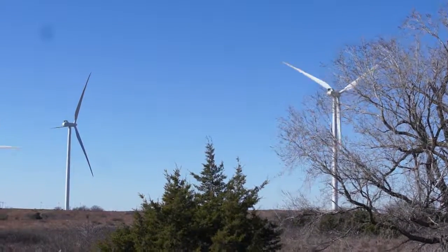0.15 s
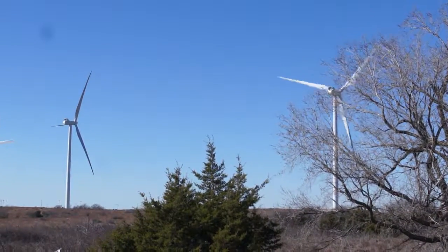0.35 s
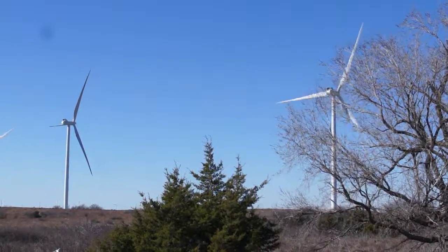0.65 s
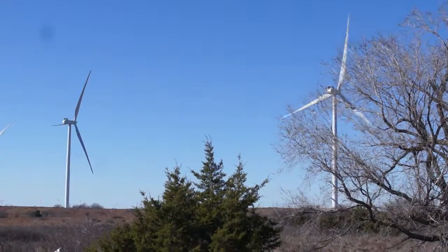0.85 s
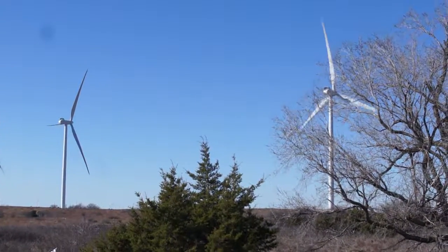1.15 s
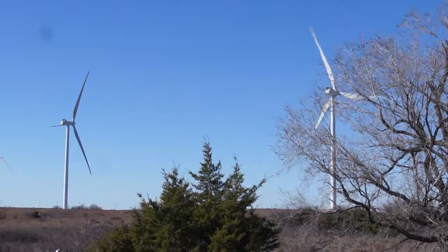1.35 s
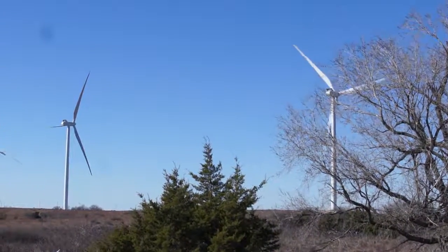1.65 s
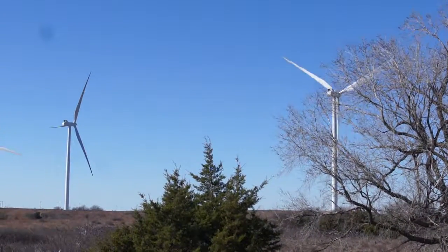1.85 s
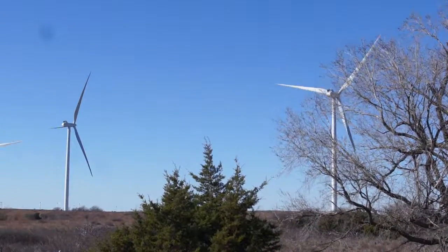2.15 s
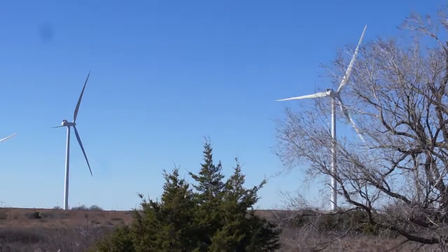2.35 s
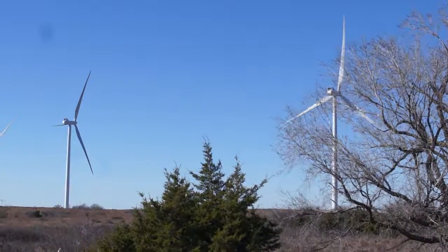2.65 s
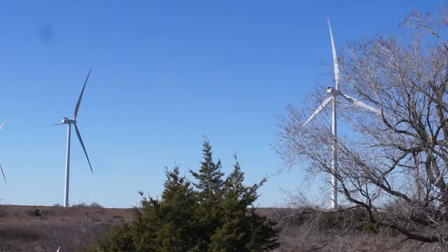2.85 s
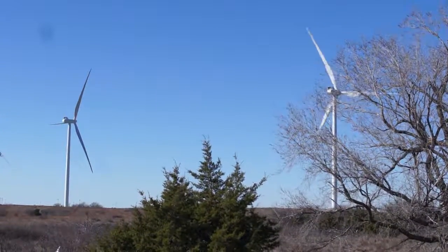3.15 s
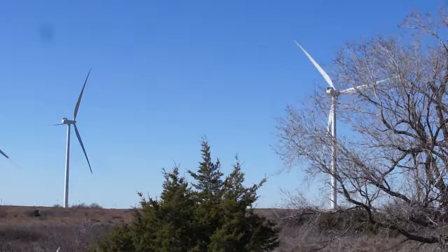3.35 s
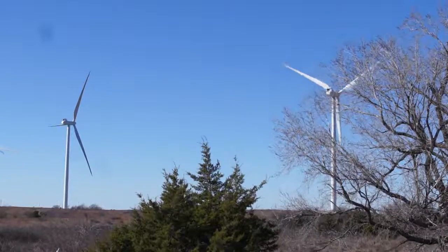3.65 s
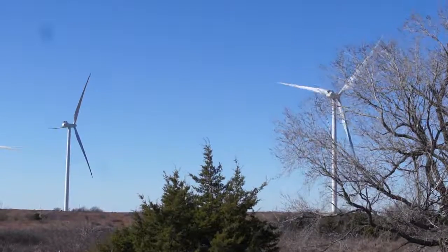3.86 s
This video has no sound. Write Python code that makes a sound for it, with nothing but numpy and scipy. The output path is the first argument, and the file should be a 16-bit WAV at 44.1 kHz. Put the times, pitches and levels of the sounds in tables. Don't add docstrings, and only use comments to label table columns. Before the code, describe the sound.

Wind turbine whooshing rhythmically, its breathy hollow swells mixed with low wind rumble and microphone puffs

```python
import sys
import numpy as np
from scipy import signal
from scipy.fft import rfft, irfft
from scipy.io import wavfile
from scipy.ndimage import uniform_filter1d

SR = 44100
rng = np.random.default_rng(int(sys.argv[2]) if len(sys.argv) > 2 else 0)


def how_loud(loudness_db):
    steps = np.asarray(loudness_db, float) / 20
    return 10 ** steps


def unload_wav(signal):
    wavfile.write(
        sys.argv[1],
        SR,
        np.round(np.clip(np.atleast_2d(signal).T, -1, 1) * 32767).astype(np.int16),
    )


N = 175959
T = np.arange(N) / SR
HZ = np.maximum(np.arange(N // 2 + 1) * SR / N, 1)
RIGHT_ONLY = np.array([[0], [1]])
PAN = np.array([[0.5], [-0.5]])


def over_time(table):
    return np.interp(T, *np.array(table, float).T)


def on_hz(table):
    hz, value = np.array(table, float).T
    return np.interp(np.log(HZ), np.log(hz), value)


def colour(table):
    octaves_below = np.maximum(np.log2(table[0][0] / HZ), 0)
    octaves_above = np.maximum(np.log2(HZ / table[-1][0]), 0)
    return how_loud(on_hz(table) - 23.0 * (octaves_below + octaves_above))


def ring(hz, width_hz):
    return np.abs(1 / (1 + 1j * (HZ ** 2 - hz ** 2) / (HZ * width_hz))) ** 2


def unit(x):
    return x / np.sqrt(np.mean(x ** 2))


def walk(rate):
    hold = int(SR / rate)
    steps = np.repeat(rng.standard_normal(N // hold + 1), hold)
    return 1.18 * uniform_filter1d(uniform_filter1d(steps, hold), hold)[:N]


def pair(loose, lead):
    both, left, right = rfft(rng.standard_normal((3, N)))
    loose = np.clip(loose, 0, 1)
    shared = np.sqrt(1 - loose) * both * np.exp(1j * lead * RIGHT_ONLY)
    return shared + np.sqrt(loose) * np.array([left, right])


# (frequency [Hz], level per Hz [dB])
RUMBLE_COLOUR = [(25, -25), (55, -18), (90, -2.5), (115, -7), (220, -2), (300, -7), (390, -15), (700, -28)]


def rumble():
    breath_db = 2.0 * np.array([walk(4.7), walk(5.91)])
    return unit(irfft(pair(0.077, 0.12) * colour(RUMBLE_COLOUR), N)) * how_loud(-41.5 + breath_db)


# (frequency [Hz], level per Hz [dB])
HISS_COLOUR = [(600, -6), (1500, -3.5), (2200, -7.5), (3000, -12), (4500, -15), (6300, -17.5),
               (8000, -20.5), (11000, -20.5)]


def hiss():
    return unit(irfft(pair(0.82, 2.63) * colour(HISS_COLOUR), N)) * how_loud(-46 + 0.4 * walk(2.6))


# (start frequency [Hz], end frequency [Hz], start level [dB], end level [dB], wobble [dB])
GEARBOX_TONES = [
    (80.1, 77.2, -48, -44.5, 1),
    (127.3, 122.8, -48, -41, 0.3),
]


def gearbox_hum():
    wander_hz, lead_rad = 0.27, 0.43
    out = 0
    for start_hz, end_hz, start_db, end_db, wobble_db in GEARBOX_TONES:
        hz = np.linspace(start_hz, end_hz, N) + wander_hz * walk(3.3)
        phase = 2 * np.pi * np.cumsum(hz) / SR
        db = np.linspace(start_db, end_db, N) + wobble_db * walk(3.96)
        out = out + np.sqrt(2) * how_loud(db) * np.sin(phase + lead_rad * RIGHT_ONLY)
    return out


# (multiple of the motor rate, left level [dB], right
# level [dB], both averaged [dB])
MOTOR_OVERTONES = [(14, -62, -66, -64), (15, -67, -64, -67), (19, -64, -63, -68), (20, -62, -59, -66),
                   (21, -73, -65, -74), (22, -63, -69, -68), (24, -57, -57, -62), (25, -65, -61, -66),
                   (27, -63, -70, -67), (30, -60, -62, -62), (32, -64, -60, -72), (40, -75, -55, -61),
                   (42, -57, -60, -69), (51, -65, -69, -79), (53, -61, -65, -74), (55, -59, -81, -65),
                   (56, -65, -77, -71), (60, -59, -77, -65), (61, -64, -70, -69), (63, -63, -74, -67),
                   (64, -68, -74, -80), (65, -82, -68, -76), (66, -66, -75, -71), (68, -63, -71, -72),
                   (69, -67, -65, -70), (74, -78, -63, -69), (76, -73, -61, -69), (78, -66, -71, -74),
                   (79, -66, -73, -74), (81, -67, -75, -70),
                   (16, -70, -72, -80), (17, -70, -70, -70), (29, -74, -67, -74), (33, -67, -66, -67),
                  (34, -74, -70, -80), (35, -69, -74, -72), (37, -73, -70, -72), (41, -67, -72, -70),
                  (43, -67, -67, -75), (45, -66, -67, -69), (46, -69, -69, -76), (47, -69, -67, -70),
                  (50, -69, -71, -78), (52, -69, -74, -78), (58, -69, -72, -74), (59, -67, -70, -70),
                  (71, -73, -72, -83), (73, -69, -76, -72), (77, -72, -73, -79), (82, -78, -68, -72),
                  (84, -77, -70, -73), (86, -80, -70, -78)]
# (time [s], share [0-1])
HAND_GRIP = [(0, 0), (.7, 0.1), (1.0, 0.75), (1.5, 0.9), (2.0, 0.4), (2.3, 0.35), (2.9, 0), (3.3, 0),
             (3.99, 0)]
# (multiple, left change [dB], right change [dB])
GRIP_EFFECT = [(24, .5, 1), (27, -3, -10), (33, 0, -3), (40, -14, 5), (41, -3, -3), (68, -2, 9),
               (76, -3, 0), (78, -2, -3)]


def motor():
    motor_hz, rest_db, trim_db, wobble_db = 123.464, -82, 0.6, 0.5
    spread = 0.236
    listed = {int(k): row for k, *row in MOTOR_OVERTONES}
    change = {int(k): row for k, *row in GRIP_EFFECT}
    grip = over_time(HAND_GRIP) - 0.5
    wobbles = [w - w.mean() for w in (walk(1.2) for _ in range(7))]
    out = np.zeros((2, N))
    for k in range(14, 90):
        left, right, both = how_loud(listed.get(k, [rest_db] * 3))
        cosine = (4 * both ** 2 - left ** 2 - right ** 2) / (2 * left * right)
        apart = np.arccos(np.clip(cosine, -1, 1))
        wave = np.exp(1j * (2 * np.pi * k * motor_hz * T + spread * np.pi * k ** 2))
        size = how_loud(trim_db + wobble_db * wobbles[k % 7]) * np.sqrt(2)
        if k in change:
            size = size * how_loud(np.array(change[k], float)[:, None] * grip)
        out += size * np.array([left * wave.real, right * (wave * np.exp(1j * apart)).real])
    return out


# (time [s], level [dB])
GRASS_GUSTS = [(0, -86), (.9, -57), (1.6, -66), (2.3, -54), (2.7, -46.5), (3.1, -52), (3.45, -56),
               (3.53, -47), (3.63, -57.5)]
# (frequency [Hz], level per Hz [dB])
GRASS_COLOUR = [(1500, 2), (3500, -4.5), (8000, -6.5), (11000, -10.5)]


def grass():
    grains = rng.standard_normal((2, N)) * how_loud(1.5 * walk(150))
    return unit(irfft(rfft(grains) * colour(GRASS_COLOUR), N)) * how_loud(over_time(GRASS_GUSTS))


# (time [s], level [dB])
WIND_PRESSURE = [(0, -68), (.45, -49), (.8, -43.5), (1.5, -45.5), (1.72, -52), (1.97, -46), (2.2, -57),
                 (2.42, -40.5), (2.62, -58), (2.77, -49), (3.3, -63), (3.7, -50), (3.99, -55)]


def buffet():
    centre_hz, patchy_db = 125, 4
    noise = unit(irfft(pair(0.32, np.pi) * ring(centre_hz, 2 * centre_hz), N))
    patches_db = patchy_db * np.array([walk(10), walk(12)])
    return noise * how_loud(over_time(WIND_PRESSURE) + patches_db)


# (time [s], peak level [dB], left minus right [dB], top frequency [Hz], length [s])
PORT_PUFFS = [(0.187, -39, 3, 140, .02), (0.438, -33, -6, 200, 0.025), (0.632, -30, -5, 250, 0.016),
              (0.769, -27, -6.5, 270, 0.028), (0.828, -25, -14, 376, 0.0059), (.97, -30.5, -15, 260, 0.009),
              (1.1, -29, -8, 200, .02), (1.33, -36, -2, 150, 0.029), (1.427, -27, -4, 330, .01),
              (1.498, -30, 2, 149, 0.036), (1.57, -34, 12, 240, 0.0099), (1.938, -24, 7.5, 219, 0.016),
              (2.013, -29, 11, 159, 0.015), (2.331, -25, -7.5, 197, 0.018), (2.408, -17.5, 3, 413, 0.012),
              (2.451, -24, 11, 163, 0.0076), (2.512, -35, 1, 300, .007), (2.73, -31, 0, 180, 0.019),
              (2.791, -28.5, -7, 240, .015), (3.092, -34, 13, 200, .02), (3.593, -30, 1, 260, 0.017),
              (3.702, -35, -7, 200, 0.012), (3.785, -34, 1, 160, 0.022)]


def puffs():
    low_hz, loose = 70, 0.28
    half = 4000
    seconds = (np.arange(2 * half) - half) / SR
    out = np.zeros((2, N))
    for at, db, pan_db, top_hz, length in PORT_PUFFS:
        band = [low_hz, max(top_hz, low_hz + 20)]
        sos = signal.butter(2, band, "bandpass", fs=SR, output="sos")
        noise = rng.standard_normal((2, 2 * half)) * np.exp(-0.5 * (seconds / length) ** 2)
        push, stray = signal.sosfilt(sos, noise)
        burst = np.array([loose * stray + push, loose * stray - push])
        burst = burst / np.abs(burst).max(axis=1, keepdims=True) * how_loud(db + pan_db * PAN)
        start = int(at * SR) - half
        out[:, start:start + 2 * half] += burst
    return out


def steady(x):
    evenness, memory = 0.63, int(0.054 * SR)
    power = uniform_filter1d(uniform_filter1d(np.mean(x ** 2, axis=0), memory), memory)
    return unit(x / (power + 1e-12) ** (evenness / 2))


# (time [s], level [dB], howl re swish [dB], brightness [dB], upper howl re swish [dB])
BLADE_SWISH = [(0, -25.5, -11.5, -10, -16), (.15, -26.5, -7.5, -10.5, -23), (.4, -31.5, -4.5, -5, -8),
               (.58, -35, -4.5, -6, -4.5), (.88, -34, -2, -8.5, 0), (1.2, -37, -4, -6.5, -1),
               (1.4, -27.5, -5.5, -8.5, -5.5), (1.65, -29, 0.5, -9, -12), (1.9, -30.5, -3.5, -9.5, -4.5),
               (2.18, -33.5, -1, -8.5, -26), (2.6, -35, 0.5, -7.5, -38), (2.8, -35, 0.5, -6, -4.5),
               (3.05, -34, 7.5, -5.5, 1), (3.31, -25, 2.5, -12, -6.5), (3.45, -29, 4.5, -9.5, -11),
               (3.64, -33.5, 5, -5, -7.5), (3.78, -29, 3.5, -11, -3.5), (3.99, -28, 7, -15, -8)]
# (frequency [Hz], level per Hz [dB])
LEFT_COLOUR = [(420, -22.5), (600, -6.5), (740, -6.5), (945, -2), (1010, -8.5), (1340, -20), (1500, -16),
               (2100, -37)]
RIGHT_COLOUR = [(420, -18.5), (640, -5), (935, -3.5), (995, -16.5), (1230, -8), (1400, -13), (1580, -19.5),
                (2100, -30)]
# (frequency [Hz], phase [rad])
RIGHT_LEAD = [(560, 0.33), (690, 2.13), (850, 0.082), (930, 0.3), (1020, 3), (1300, 0.8), (1450, 0.99),
              (1700, 1.3)]
# (frequency [Hz], share [0-1])
UNRELATED = [(420, 0.32), (560, 0.01), (930, 0.04), (1000, 0.82), (1300, 0.43), (1600, 0), (1750, 0.97)]
# (left level [dB], right level [dB])
UPPER_HOWL_PORTS = [-2, 4]


def swish():
    bright_from_hz, bright_ref_db, flutter_db, trim_db = 1010, -8, 0.3, 0.74
    at, *columns = np.array(BLADE_SWISH, float).T
    db, howl_db, bright_db, upper_db = [np.interp(T, at, column) for column in columns]

    ports = np.array([colour(LEFT_COLOUR), colour(RIGHT_COLOUR)])
    air = pair(on_hz(UNRELATED), on_hz(RIGHT_LEAD)) * ports
    is_bright = 1 / (1 + (bright_from_hz / HZ) ** 20)
    low = irfft(air * (1 - is_bright), N)
    high = irfft(air * is_bright, N) / np.std(low)
    low = steady(unit(low)) * how_loud(flutter_db * walk(14.0))
    high = high * how_loud(bright_db - bright_ref_db + flutter_db * walk(7.1))

    howl = irfft(pair(0.019, 0.55) * ring(610, 67) * how_loud(1.5 * PAN), N)
    upper_pan = how_loud(np.array(UPPER_HOWL_PORTS, float)[:, None])
    upper_howl = irfft(pair(0.019, 0.82) * ring(725, 97) * upper_pan, N)
    howls = steady(unit(howl)) * how_loud(howl_db) + steady(unit(upper_howl)) * how_loud(upper_db)
    return how_loud(db + trim_db) * (low + high + howls)


def scene():
    background = rumble() + hiss() + gearbox_hum() + motor()
    return background + grass() + buffet() + puffs() + swish()


def band_limit(x):
    return signal.sosfilt(signal.butter(12, 11000, fs=SR, output="sos"), x)


def record(dry):
    low_cut = signal.butter(2, 29, "highpass", fs=SR, output="sos")
    top_cut = signal.ellip(10, 0.2, 60, 11020, fs=SR, output="sos")
    mix = signal.sosfilt(top_cut, signal.sosfilt(low_cut, dry))
    return band_limit(mix)


dry = scene()
out = record(dry)
unload_wav(out)
```